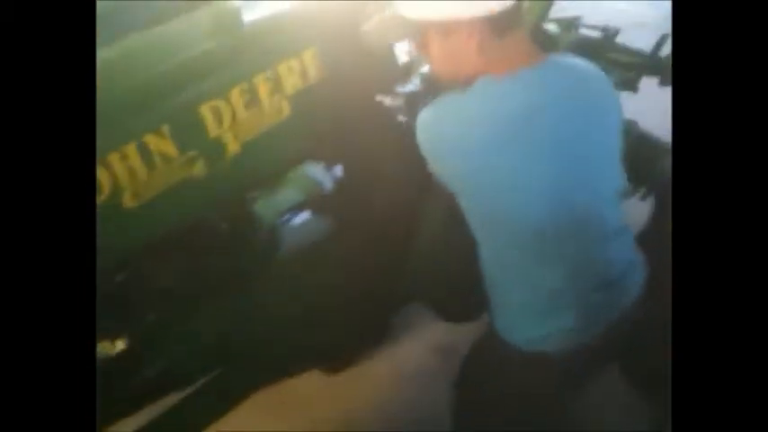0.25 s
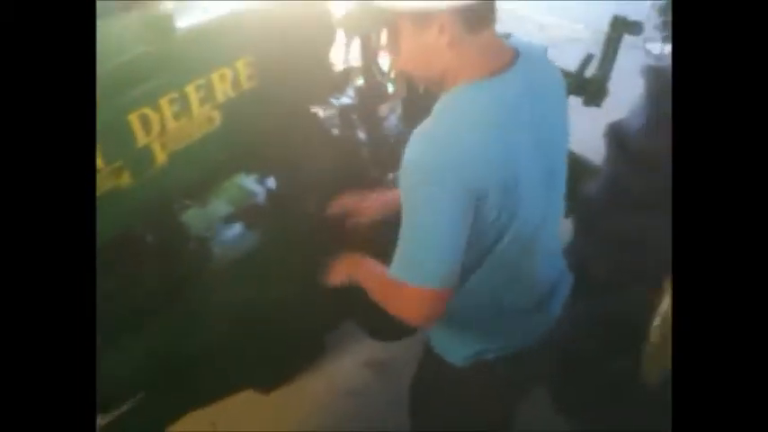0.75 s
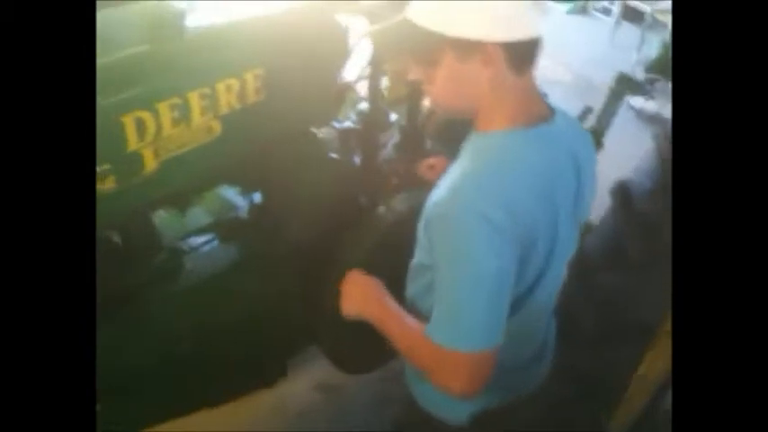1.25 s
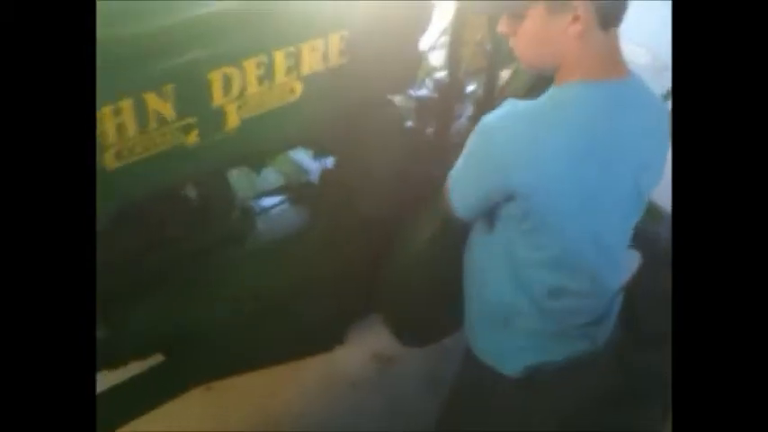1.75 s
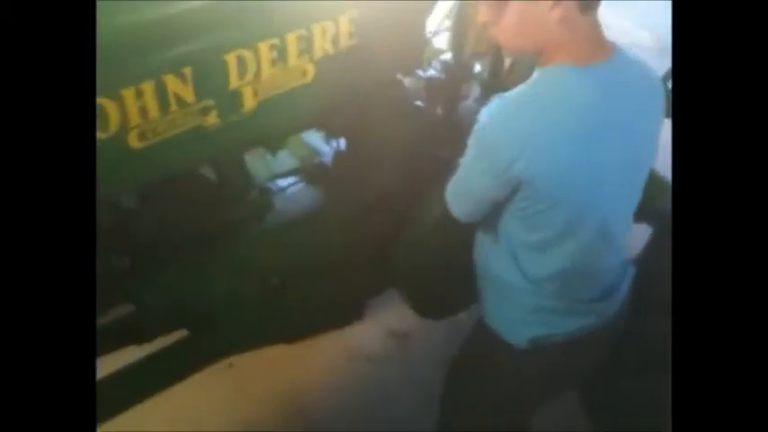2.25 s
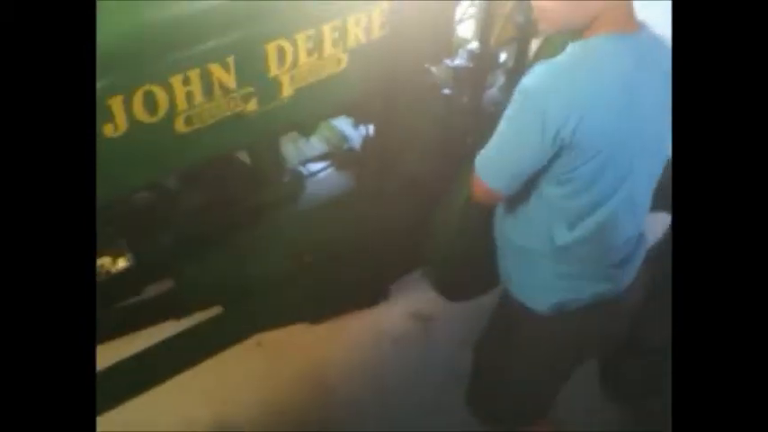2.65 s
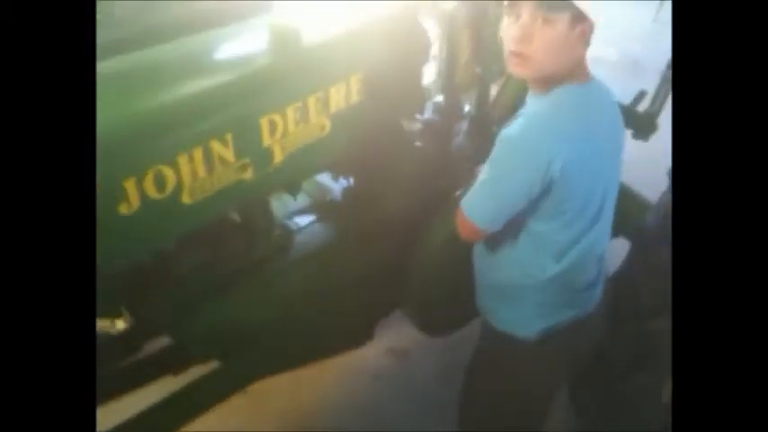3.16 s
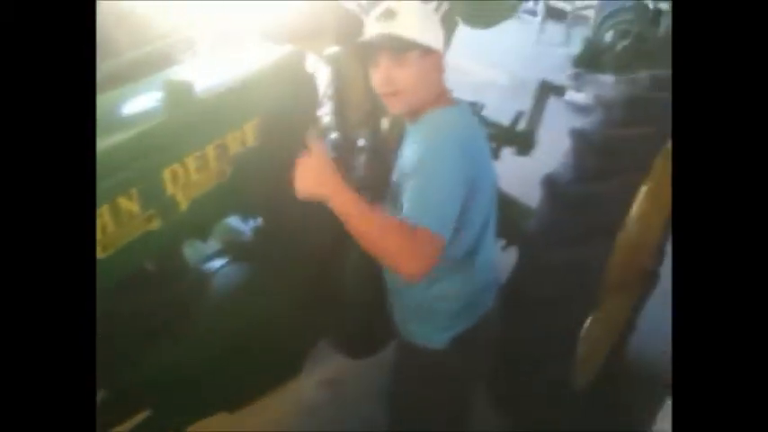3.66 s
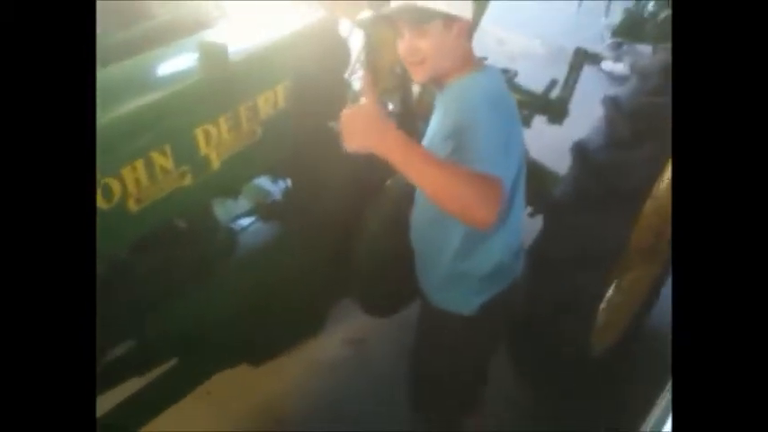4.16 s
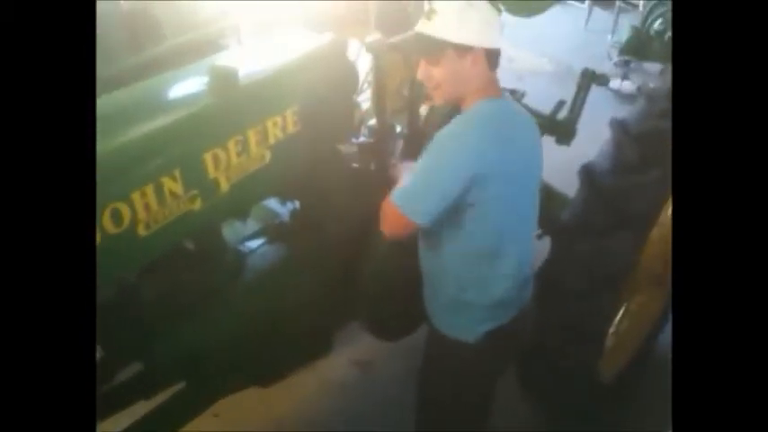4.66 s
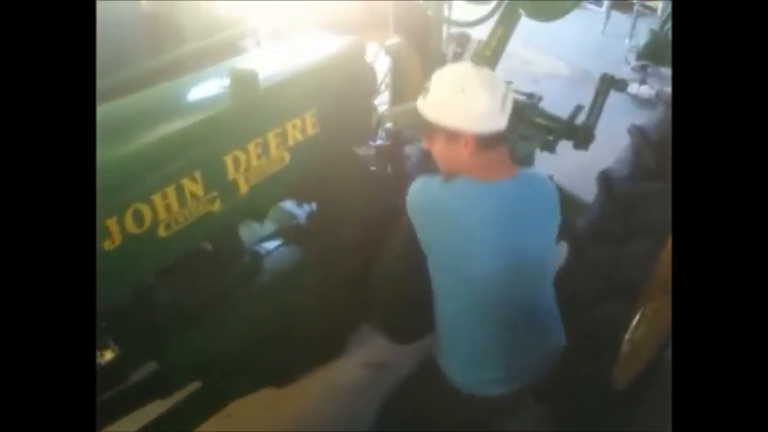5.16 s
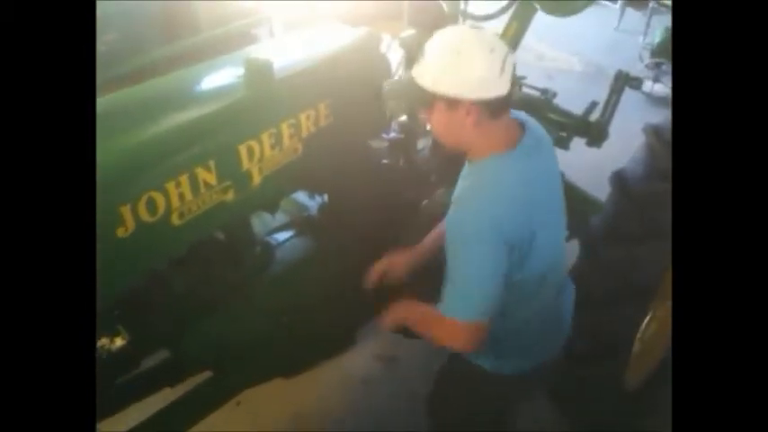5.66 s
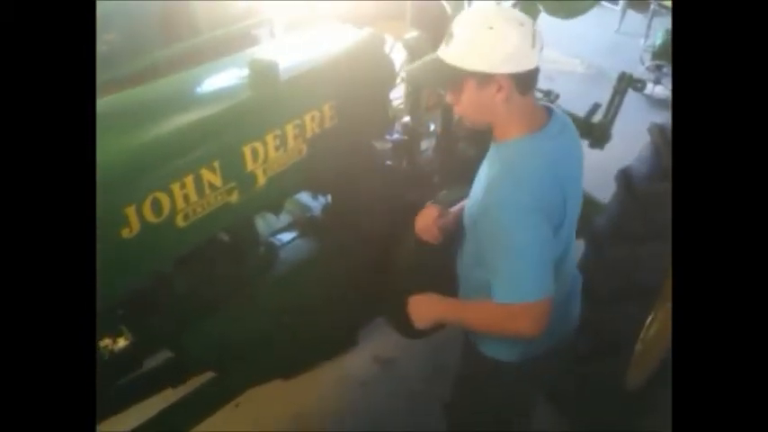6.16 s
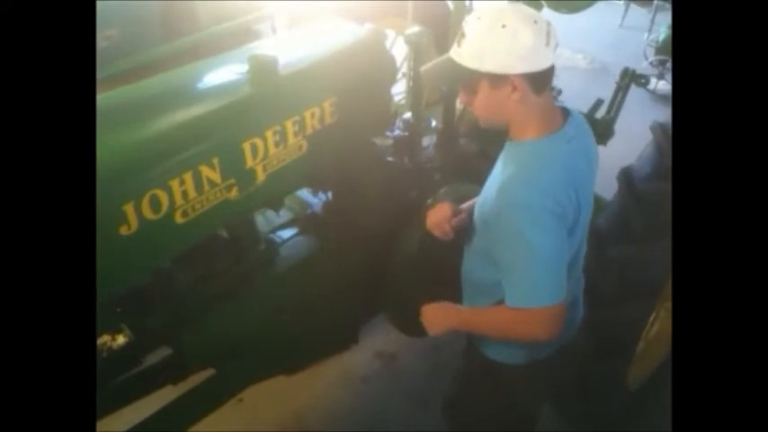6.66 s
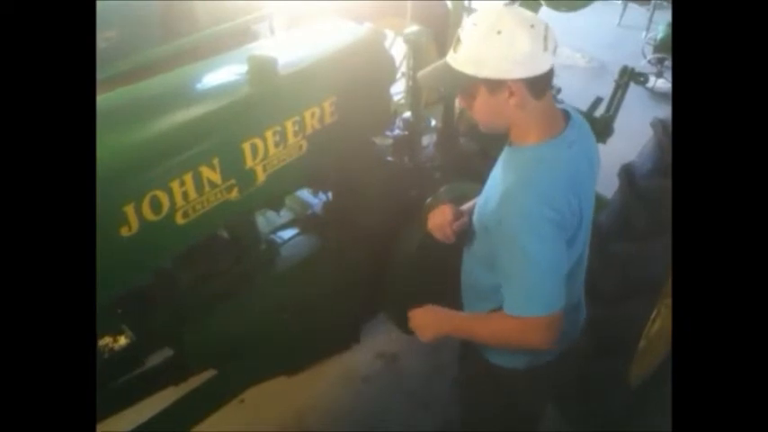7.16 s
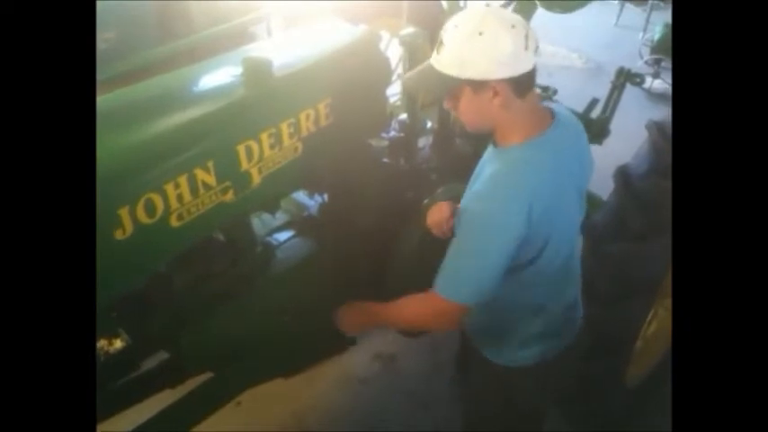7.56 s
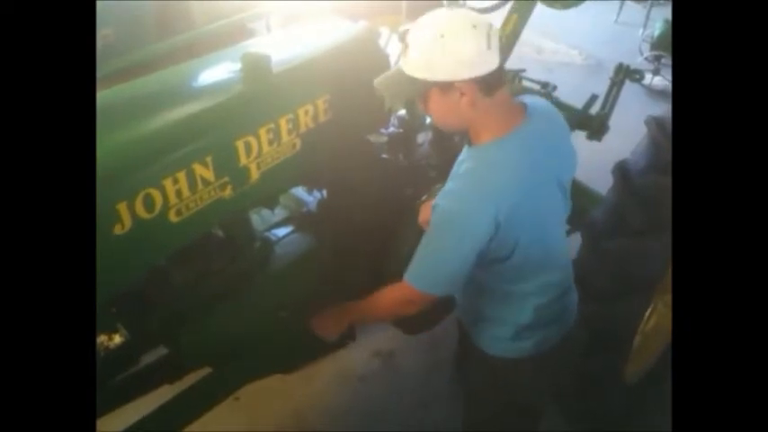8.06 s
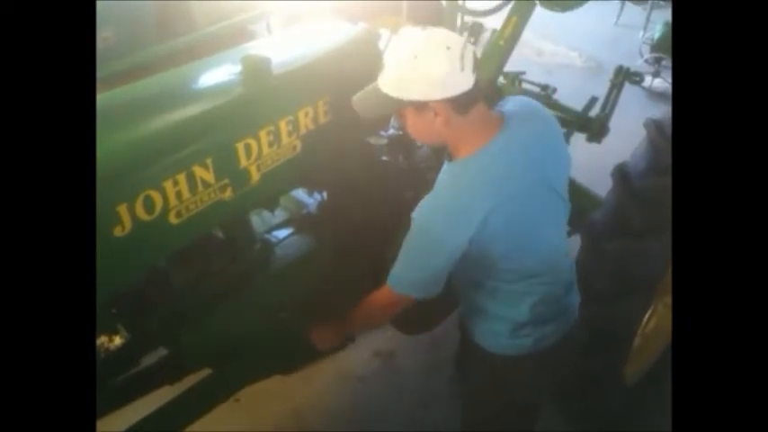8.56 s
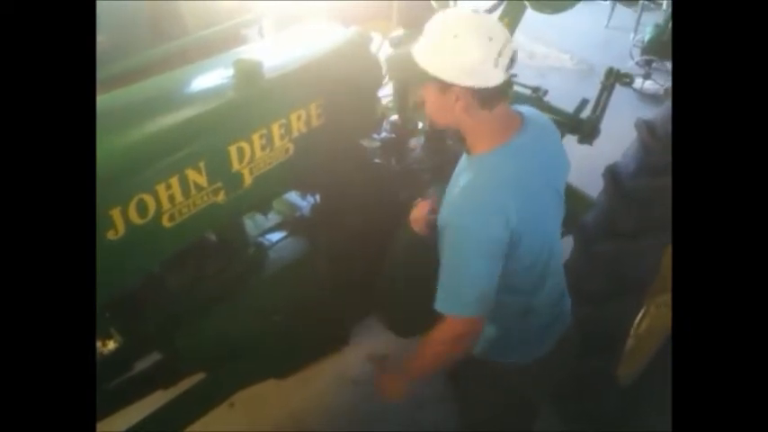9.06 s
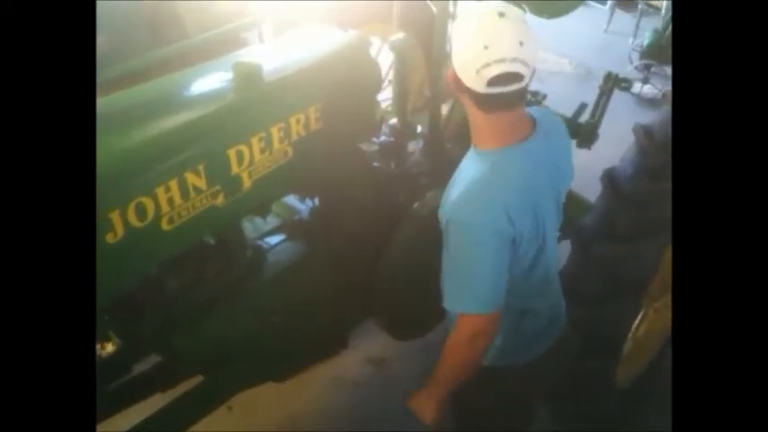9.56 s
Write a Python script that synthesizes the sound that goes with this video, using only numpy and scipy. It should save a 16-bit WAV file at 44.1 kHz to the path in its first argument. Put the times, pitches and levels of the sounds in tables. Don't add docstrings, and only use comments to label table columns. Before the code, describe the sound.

Hand-swung flywheel of an old two-cylinder tractor: air hisses, iron knocks, a second swing catches, blasting air jets give way to uneven exhaust popping.

```python
import sys
import numpy as np
from scipy import signal
from scipy.fft import rfft, irfft, next_fast_len
from scipy.io import wavfile
from scipy.ndimage import uniform_filter1d

SR = 44100
rng = np.random.default_rng(int(sys.argv[2]) if len(sys.argv) > 2 else 0)


def boost_factor(decibels):
    exponent = np.asarray(decibels, float) / 20
    return 10 ** exponent


def persist_wave(psi):
    counts = np.round(np.clip(psi, -1, 1) * 32767).astype(np.int16)
    wavfile.write(sys.argv[1], SR, np.atleast_2d(counts).T)


N = 432621
TIME = np.arange(N) / SR

# (time [s], level [dB])
PULL = [
    (0.0, -51.5),
    (0.118, -66.5),
    (0.35, -57.5),
    (0.465, -37.5),
    (0.565, -26.5),
    (.618, -25.5),
    (.645, -38.5),
    (0.74, -49),
    (.901, -58.5),
]
SQUEEZE = [
    (0.94, -32.5),
    (0.97, -23.5),
    (1.19, -16.5),
    (1.35, -21.5),
    (1.51, -32),
    (2.2, -38),
]
ROCK_BACK = [
    (2.47, -31),
    (3.07, -46.5),
    (3.34, -57),
    (3.52, -68.5),
    (3.62, -77),
    (3.76, -76.5),
]
REST = [
    (3.79, -61),
    (4.05, -51.5),
    (4.2, -67),
    (4.386, -69.5),
    (4.9, -61.5),
    (5.056, -56.5),
    (5.16, -77.5),
    (5.24, -67.5),
]
SECOND_PULL = [
    (5.334, -42.5),
    (5.478, -26),
    (5.6, -30),
]
RUNNING = [
    (5.75, -27),
    (5.9, -48.5),
    (6.22, -27),
    (6.35, -18.5),
    (7.86, -31.5),
    (8.02, -23.5),
    (8.18, -24.5),
    (8.53, -32.5),
    (9.81, -32.5),
]
STROKE_FIZZ = [
    4.5,
    -1,
    -1,
    -5,
    0,
    -3,
]
# (centre [Hz], width [Hz], level [dB])
WHISTLE = [(2040, 310, -1), (4330, 520, -3), (5720, 530, -6), (13400, 1000, -13.5), (5800, 2800, -2)]
# (frequency [Hz], level [dB])
BORE_AIR = [(300, -90), (1500, -10), (3000, 0), (8000, 0), (16000, -2)]
# (frequency [Hz], level [dB])
BLAST = [(300, -87.5), (1200, -15.5), (1700, -9.5), (3300, -12.5), (5400, -1.5), (7200, 1), (8500, -6),
         (11000, -5.5), (16000, -49.5)]
# (frequency [Hz], level [dB])
FIZZ = [(1000, -86.5), (5000, -39.5), (8000, -4.5), (10200, -0.5), (12000, -4.5), (13500, -4.5),
        (16000, -6.5)]
# (start [s], end [s], frequency [Hz], width [Hz], level over flow [dB])
EDGE_TONES = [(0, .14, 6600, 300, 0), (.33, .56, 9500, 500, -2), (.38, .56, 13700, 300, -11),
              (1.4, 2.3, 13450, 1800, -5), (2.1, 3.2, 13000, 2200, -5), (2.197, 2.8, 10300, 500, -19),
              (2.7, 3.56, 13400, 1700, -4), (2.6, 3.8, 4270, 150, -11), (1.6, 2.9, 4300, 370, -11),
              (2.2, 3.5, 6400, 300, -16), (5.657, 5.752, 11000, 5000, 23), (7.5, 7.545, 11550, 900, 22.5),
              (3.46, 3.7, 2010, 20, 4), (2.2, 3.8, 2100, 180, -22), (4.4, 5.2, 6200, 800, -11)]

# (time [s], gear level [dB])
MACHINERY = [(0.0, -50), (0.24, -52.5), (0.38, -45), (1.04, -37.5), (1.2, -35.5), (1.46, -44),
             (2.24, -50.5), (2.54, -44.5), (2.87, -46.5), (3.47, -58.5), (3.85, -60.5), (4.7, -53.5),
             (5.3, -53), (5.79, -35), (6.17, -28), (6.39, -24.5), (6.72, -24), (9.81, -23)]
# (time [s], level [dB])
LOAD = [
    (1.3, -7),
    (1.7, -11),
    (2.3, -4.5),
    (3.5, -4.5),
    (4, -6),
    (6.4, -6),
    (7.6, -0.6),
]
# (time [s], level [dB], rise [s], t60 [s])
LURCHES = [
    (3.92, -35.5, 0.043, 0.98),
    (5.6, -37.5, 0.12, 0.53),
]
# (frequency [Hz], level [dB])
BLOCK = [(15, -71), (25, -41), (75, -12), (179, 4.5), (313, 4.5), (357, 6), (460, -1.5), (600, -9),
         (780, -36), (1320, -120)]
# (frequency [Hz], level [dB])
GEARS = [(320, -17), (480, 3.5), (861, 2), (1360, 3), (2600, 0), (3000, -2), (4200, -16.5), (6000, -65),
         (8800, -120)]
# (frequency [Hz], level [dB])
YARD = [(20, -17), (60, -13), (110, 8.5), (200, 2.5), (500, -57), (900, -120)]
# (frequency [Hz], level [dB])
INSECTS = [(3500, -120), (6100, -15), (6600, -4), (7100, -8), (9000, -120)]

# (time [s], peak [dB], thud [dB], tick [dB], t60 [s])
FRAME = [(0.204, -36.5, -2, -22, 0.39), (0.225, -44.5, -9, 4.5, 0.42), (0.279, -36.5, -12, 7, 0.07),
         (0.376, -37, -12, -16, 0.27), (1.19, -27, -5, -6.5, 0.083), (1.897, -29, -11.5, -23, 0.31),
         (2.257, -35.5, -12, -11.5, 0.98), (2.57, -40, -7, -19, .2), (2.587, -33, 4.5, -5.5, 0.33),
         (2.938, -34.5, -3, -20, 0.12), (2.996, -40, -23, -16, 1), (4.045, -24, 1.5, 2.5, 0.16),
         (4.099, -33, -5.5, -20.5, 0.59), (5.053, -50, -33, 2, 0.36), (5.822, -18, -25, -10, 0.59)]
# (time [s], peak [dB], thud [dB], tick [dB], t60 [s])
CASE = [(0.473, -29.5, -8, -2, 0.42), (0.715, -41, 7, -12.5, 0.23), (0.75, -16, -22, 1.5, 0.46),
        (2.36, -30, -11, -15.5, 0.26), (2.748, -33.5, -1, -11, 0.17), (3.213, -43, -1.5, -25, 0.3),
        (3.778, -45, -1, -5, 0.84), (3.815, -15.5, -8, -33.5, 0.15), (3.829, -16, -26, -29, 0.61),
        (4.0, -25.5, -17, -9, 0.53), (4.159, -35, -5, -18, 0.23), (5.26, -41, -4, -23.5, 0.63),
        (5.359, -32.5, -10, -10, 0.4), (5.603, -21.5, -12, 2.5, 0.69), (6.165, -19, -20, -2, .2),
        (6.35, -8, -8, -12, .2), (6.575, -9, -10, -12, .15)]
# (frequency [Hz], level [dB])
CASTING = [(60, -61.5), (250, -9.5), (500, -6), (1000, -5.5), (2500, -6), (3200, -16.5), (8000, -20.5),
           (16000, -35)]
# (time [s],
# frequency [Hz], level [dB], t60 [s])
CLINKS = [(0.472, 1365, -37, 0.19), (0.751, 924, -34.5, 0.4), (.75, 1754, -25.5, 0.15),
          (.8, 236.6, -29, 0.41), (1.061, 271.5, -35, 0.5), (1.2, 160, -38.5, 0.68),
          (1.898, 2120, -23.5, 0.1), (2.591, 149.7, -38, 0.4), (2.748, 160, -34.5, 0.35),
          (2.585, 250, -39, .4), (2.6, 368, -42, .3), (2.75, 297, -40, .25), (2.45, 130, -46, .5),
          (8.1, 778, -19.5, 0.22), (2.934, 1010, -43, .06), (2.999, 1320, -40, .08),
          (3.825, 104.5, -32, 0.64), (3.829, 1210, -14.5, 0.022), (4.051, 104.4, -33.5, 0.77),
          (5.045, 2400, -46, .08), (5.39, 248, -42, 1), (5.823, 1910, -23, 0.28), (6.35, 2164, -16.5, 0.64),
          (6.35, 977, -13, 0.13), (6.863, 1030, -17, 0.32), (6.87, 1990, -14, 0.51), (7.27, 804, -30, 0.92),
          (7.53, 670, -16.5, 0.23), (7.53, 1053, -15.5, 0.084), (7.694, 10630, -12, 0.061),
          (.76, 62, -48.5, 0.36), (.88, 55.2, -45.5, 0.34), (1.94, 70.3, -47.5, .4), (3.83, 151, -30, 0.43),
          (8.5, 910, -36, 0.16)]
# (time [s], frequency [Hz], level [dB], t60 [s])
RINGS = [(5.36, 205, -43, 1.2), (1.898, 1830, -34, 0.065), (.221, 158, -28, .25), (.21, 243, -37.5, 0.22),
         (.317, 155, -37, 0.35), (2.26, 2200, -51, .4), (2.94, 800, -44, .04), (2.94, 450, -46, .04),
         (3.215, 620, -46, 0.041), (3.24, 270, -49, .3), (5.824, 1750, -24, .12), (5.83, 2060, -25.5, .15),
         (5.635, 285, -29.5, .3), (5.63, 500, -34.5, .25), (5.77, 430, -34, 0.25), (9.28, 664, -19, 0.22),
         (2.36, 340, -45, .2), (2.589, 1400, -47, .15), (2.935, 580, -52, 0.12), (3.21, 398, -47, 0.16),
         (6.35, 448.4, -21.5, 0.24), (7.09, 200, -20, 0.21), (.752, 920, -36, 0.49), (.76, 2400, -36, .3),
         (.756, 1500, -34, .3), (.79, 600, -41, 0.17), (.756, 1700, -41, .5), (.756, 2690, -37.5, 0.41),
         (3.85, 2330, -39, .3), (3.85, 2590, -45, .3), (3.83, 1356, -35, 0.37), (3.815, 1100, -31, 0.11),
         (6.365, 2205, -26, 0.3), (6.56, 1170, -20, 0.13), (6.56, 2130, -22, 0.32), (7.045, 820, -22, 0.25),
         (7.28, 780, -28.5, 0.61), (7.315, 1890, -23, 0.073), (8.5, 912, -27, 0.37), (8.5, 690, -34, 0.61),
         (8.9, 774, -27, 0.34), (8.93, 1134, -26.5, 0.2), (9.28, 710, -32, .4), (9.53, 1350, -29, 0.36)]

# (time [s], rms level [dB], rise [s], hold [s], t60 [s])
JETS = [(0.776, -27, 0.025, 0.015, 0.14), (0.826, -23.5, 0.018, 0.03, 0.15),
        (0.934, -21.5, .004, 0.081, 0.26), (5.647, -6, 0.026, 0.03, 0.53), (5.987, -23, 0.054, .02, .1),
        (6.035, -10.5, 0.049, 0.0091, 0.1), (6.073, -12, .015, .022, .05), (6.109, -24, .01, 0.018, .1),
        (6.173, 2, 0.027, 0.16, 0.15), (6.504, 2, 0.012, 0.05, 0.3), (6.723, -6, 0.018, .002, 0.06),
        (6.817, -2, 0.021, 0.034, 0.34), (6.996, 1.5, 0.02, 0.019, 0.29), (7.216, 1, 0.024, 0.018, 0.22),
        (7.437, 0.1, 0.0084, 0.044, 0.51), (7.853, 1.5, 0.0073, 0.03, 0.33),
        (8.078, -6.5, 0.013, 0.013, 0.081), (8.114, -9.5, 0.014, 0.025, 0.24),
        (8.26, -1.5, 0.0046, 0.027, 0.26), (8.913, -9.5, 0.02, 0.006, 0.25),
        (9.484, -7, 0.023, 0.016, 0.36)]
# (time [s], body [dB], treble [dB])
PUFFS = [(5.622, -22, -17.5), (6.47, -10, -0.5), (6.758, -16.5, -6), (6.968, -23, -7), (7.19, -24, -8.5),
         (7.411, -19.5, -7.5), (7.425, -13.5, -18.5), (7.828, -10.5, -8.5), (8.053, -12.5, -7),
         (8.238, -18.5, -10), (8.545, -31, -28), (8.74, -31.5, -29), (9.13, -33, -23.5)]
# (frequency [Hz], level [dB])
JET = [(590, -26), (1000, -18), (2340, -5.5), (2560, -6.5), (3830, -7), (5000, -1.5), (7720, -1.5),
       (15500, -2)]
# (time [s], level [dB])
JET_TOP = [
    (0, -9),
    (5.6, -1),
    (6.2, -4.5),
    (8.3, -2),
    (8.8, -9.5),
]

# (time [s], length [s], frequency [Hz], level [dB])
SQUEAKS = [
    (1.628, 0.076, 598, -45.5),
    (1.72, 0.025, 510, -49),
]

# (time [s], peak [dB], t60 [s])
CHUFFS = [
    (5.602, -17, 0.35),
    (5.824, -10, 0.083),
    (6.1654, -7, 0.17),
    (6.8044, -21, 0.1),
]
# (share of turn [0-1], level [dB], t60 [s], heard from [s])
VALVE_GEAR = [
    (0.014, -12, 0.16, 8.4),
    (.275, -14.5, 0.035, 7.6),
    (.548, -9.5, .085, 7.4),
]
# (frequency [Hz], level [dB])
CHUFF = [(60, -80), (300, -14), (1000, -7), (2500, 2.5), (5500, -4), (9000, -8), (16000, -16.5)]

# (time [s], level [dB],
# thump [Hz], bark [dB])
STRAYS = [
    (5.768, -23.5, 214, -30),
    (6.179, -28, 430, 19),
    (6.271, -10, 262, 8),
    (6.347, -5.5, 320, 1.5),
    (7.151, -17.5, 342, -0.5),
    (11, -26.5, 321, -18),
    (8.927, -11.5, 470, -13.5),
    (9.518, -11.5, 474, -12),
    (7.09, -10.5, 270, -15.5),
]
# (time [s], first level [dB], first bark [dB], second level [dB], second thump [Hz])
TURNS = [(6.556, -12.5, 7, -17.5, 179), (6.863, -5.5, 2, -19, 189.5), (7.038, -6.5, -4, -15, 210),
         (7.262, -11.5, -2, -22.5, 169), (7.479, -9.5, 0, -2.5, 207), (7.69, -28, -18.5, -43, 183.5),
         (7.893, -7.5, -2.5, -26, 172), (8.093, -9.5, -3.5, -6.5, 330), (8.295, -9.5, -8.5, -13.5, 183),
         (8.493, -6.5, -30, -18, 188), (8.692, -8, -14.5, -14, 178), (8.887, -6.5, -14.5, -8, 350),
         (9.08, -8.5, -9.5, -12.5, 353), (9.277, -6, -17, -19, 180.4), (9.475, -6, -5, -7.5, 363),
         (9.671, -9, -17, -14, 175.5)]
# (frequency [Hz], level [dB], t60 [s])
PIPE = [(172.4, -3.5, 0.3), (350, -1.5, 0.21), (443, -4.5, 0.2), (498.6, -6.5, 0.26), (668, -8.5, 0.32),
        (855.5, -4, 0.18), (888, -7, 0.089), (1070, -12.5, 0.092), (1170, -12, 0.18)]
# (frequency [Hz], level [dB])
BARK = [(100, -78.5), (400, -10.5), (700, -4.5), (1200, -4.5), (2500, -8), (5000, -14.5), (12000, -37)]

# (frequency [Hz], t60 [s])
SHED = [(150, 0.54), (1000, 0.92), (4000, 0.68), (15000, 0.13)]
# (frequency [Hz], level [dB])
MICROPHONE = [(20, -21.5), (60, -9), (90, -2.5), (120, -4.5), (200, -0.5), (16000, -2)]
# (time [s], from [Hz], to [Hz], level [dB])
SLIPS = [
    (1.09, 5700, 8300, -26),
    (1.44, 11000, 12400, -43),
    (2.83, 5700, 6900, -52),
    (7.5, 6800, 8350, -14),
    (7.49, 11000, 12300, -25),
    (7.889, 12800, 14300, -21),
]

FIZZ_KNEE_DB, FIZZ_FADES = -52.5, 0.55
EDGE_RISE, EDGE_FADE_S = 0.0015, 0.2
LURCH_GEAR_DB = -15
GEAR_BEAT, GEAR_RATTLE_DB, GEAR_RATTLE_HZ = 0.97, 1.5, 139
FRAME_HZ, CASE_HZ = 160, 262
MODE_DB, MODE_GAP_HZ = 3, 71.6
CLUSTER_SPREAD, RING_SPREAD = 0.034, 0.004
JET_TILT_DB, TOP_SPLIT_HZ = 3.5, 12000
PUFF_RISE_S, PUFF_HOLD_S, PUFF_T60_S = 0.012, 0.004, 0.1
SPUTTER_DB, SPUTTER_HZ = 1, 88.3
CHUFF_SCATTER_DB = 0.4
FIRST_HZ, SECOND_AFTER_S, SECOND_BARK_DB = 228.5, 0.0465, -5.5
RAGGED_DB, RAGGED_HZ = 0.5, 120
FAVOUR_DB, FAVOUR_OCTAVES = 4.5, 0.15
OVERLOAD, OVERLOAD_KNEE = 0.83, 14
HISS_DB, TOP_HZ = -72, 15780


def unit(x):
    return x / np.sqrt(np.mean(x ** 2) + 1e-20)


def along(points, hz):
    f, v = np.transpose(points)
    return np.interp(np.log(hz + 1), np.log(f + 1), v)


def curves(rows):
    s, *cols = np.transpose(rows)
    return [np.interp(TIME, s, c) for c in cols]


def filtered(x, response):
    m = next_fast_len(x.shape[-1] + 8192)
    spectrum = rfft(x, m) * response(np.fft.rfftfreq(m, 1 / SR))
    return irfft(spectrum, m)[..., :x.shape[-1]]


def resonance(modes):
    return lambda f: sum((-1) ** k * boost_factor(db) * 1j * f * w / (c * c - f * f + 1j * f * w)
                         for k, (c, w, db) in enumerate(modes))


def rush(spectrum, patchy_db):
    z = signal.stft(rng.standard_normal(N), nperseg=512)[2]
    field = uniform_filter1d(rng.standard_normal(z.shape), size=5, axis=0)
    field = uniform_filter1d(field, size=8, axis=1)
    x = signal.istft(z * boost_factor(patchy_db * unit(field)), nperseg=512)[1][:N]
    return unit(filtered(x, lambda hz: boost_factor(along(spectrum, hz))))


def flicker(db, low_hz, high_hz):
    noise = rng.standard_normal(N)
    return boost_factor(db * unit(filtered(noise, lambda hz: (hz > low_hz) & (hz < high_hz))))


def add(track, s, sound):
    part = track[round(s * SR):][:len(sound)]
    part += sound[:len(part)]


def burst(s, rise, hold, t60):
    out = np.zeros(N)
    first = np.ceil(s * SR) / SR
    t = TIME[:2 * SR] + first - s
    ramp = np.clip(t / rise, 0, 1) ** 1.24
    add(out, first, ramp * boost_factor(-60 * np.clip(t - rise - hold, 0, 2) / t60))
    return out


def leak():
    strokes = [PULL, SQUEEZE, ROCK_BACK, REST, SECOND_PULL, RUNNING]
    rows = [(s, db, over) for stroke, over in zip(strokes, STROKE_FIZZ) for s, db in stroke]
    flow_db, over_db = curves(rows)
    fizz_db = flow_db + over_db - FIZZ_FADES * np.clip(FIZZ_KNEE_DB - flow_db, 0, None)
    blend = np.pi / 2 * np.clip((flow_db + 31) / 10, 0, 1)
    bore = rush(BORE_AIR, patchy_db=1.4)
    bore = unit(filtered(bore, lambda hz: sum(abs(resonance([mode])(hz + 1)) for mode in WHISTLE)))
    air = np.cos(blend) * bore + np.sin(blend) * rush(BLAST, patchy_db=1.3)
    return boost_factor(flow_db) * air + boost_factor(fizz_db) * rush(FIZZ, patchy_db=1.6) + edge_tones(flow_db)


def edge_tones(flow_db):
    out = np.zeros(N)
    for start, end, hz, width, db in EDGE_TONES:
        t = TIME[:round((end - start) * SR)]
        level_db = np.interp(start + t, TIME, flow_db)
        noise = rng.standard_normal(2 * SR)
        flutter = filtered(noise, lambda f: 1 / (1 + (2 * f / width) ** 4))[:len(t)]
        pitch = hz * (1 + EDGE_RISE * np.clip(level_db + 38, -20, 10))
        turn = 2 * np.pi * np.cumsum(pitch) / SR
        fade = min(EDGE_FADE_S, (end - start) / 2)
        gate = np.clip(np.minimum(t, end - start - t) / fade, 0, 1)
        add(out, start, boost_factor(level_db + db) * gate * unit(flutter * np.sin(turn)))
    return out


def rumble():
    (gear_db,), (block_db,) = curves(MACHINERY), curves(LOAD)
    lurch = sum(boost_factor(db) * burst(s, rise, 0.01, t60) for s, db, rise, t60 in LURCHES)
    beat = sum(burst(s, 0.0093, 0.0087, 1.0) for s, *rest in firings())
    beat = (0.34 + beat) / (0.47 + uniform_filter1d(beat, size=SR // 3))
    block = (boost_factor(gear_db + block_db) + lurch) * rush(BLOCK, patchy_db=2.2)
    chatter = flicker(GEAR_RATTLE_DB, 15, GEAR_RATTLE_HZ)
    gears = (boost_factor(gear_db) + boost_factor(LURCH_GEAR_DB) * lurch) * unit(chatter * rush(GEARS, patchy_db=2.5))
    drone = beat * block + beat ** GEAR_BEAT * gears
    yard = boost_factor(-65) * rush(YARD, patchy_db=2)
    insects = boost_factor(-66) * burst(4.24, 0.302, 0.53, 0.56) * rush(INSECTS, patchy_db=8)
    return drone + yard + insects


def knocks():
    out, t = np.zeros(N), TIME[:SR]
    for thud_hz, s, db, thud_db, tick_db, t60 in [(FRAME_HZ, *k) for k in FRAME] + [(CASE_HZ, *k) for k in CASE]:
        a, b, c = rng.standard_normal((3, SR))
        modes_db = MODE_DB * rng.standard_normal(SR // 100)
        mode_numbers = np.arange(len(modes_db))
        hollow = resonance([(thud_hz, 30, 0), (1.58 * thud_hz, 50, -5)])
        thud = unit(filtered(a, lambda hz: hollow(hz) * hz ** 2 / (hz ** 2 + 110 ** 2)))
        thud = thud * boost_factor(thud_db - 40 * t / t60)
        body = unit(filtered(b, lambda hz: boost_factor(
            along(CASTING, hz) + np.interp(hz / MODE_GAP_HZ, mode_numbers, modes_db))))
        body = body * (boost_factor(-60 * t / t60) + 0.26 * boost_factor(-60 * t / 0.1))
        tick = unit(filtered(c, resonance([(6360, 4700, 0)]))) * boost_factor(tick_db - 90 * t / t60)
        add(out, s - 0.001, boost_factor(db - 6.5) * (thud + body + tick) * (1 - np.exp(-t / 0.0017)))
    return out


def clinks():
    out, t = np.zeros(N), TIME[:SR]
    for spread, s, hz, db, t60 in [(CLUSTER_SPREAD, *c) for c in CLINKS] + [(RING_SPREAD, *c) for c in RINGS]:
        cluster = hz + spread * (100 + hz) * rng.standard_normal((9, 1))
        phase = 1.42 * rng.standard_normal((9, 1)) * (hz < 400)
        ring = np.sin(2 * np.pi * cluster * t + phase).sum(axis=0)
        add(out, s, boost_factor(db - 11 - 60 * t / t60) * np.clip(t * hz, 0, 1) * ring)
    return out


def jets():
    air = rush([(100, -92)] + JET, patchy_db=1.9)
    air = unit(air * flicker(SPUTTER_DB, 15, SPUTTER_HZ))
    dull = filtered(air, lambda hz: 1 / (1 + (hz / 7500) ** 4))
    middle = filtered(air - dull, lambda hz: 1 / (1 + (hz / TOP_SPLIT_HZ) ** 6))
    top = air - dull - middle
    blows = [(*jet, JET_TILT_DB) for jet in JETS]
    blows += [(s, (db + treble_db) / 2, PUFF_RISE_S, PUFF_HOLD_S, PUFF_T60_S, (treble_db - db) / 2)
              for s, db, treble_db in PUFFS]

    def swell(tilt, ring):
        return sum(boost_factor(db + tilt * tilt_db) * burst(s, rise, hold, ring * t60)
                   for s, db, rise, hold, t60, tilt_db in blows)

    return swell(-1, 1) * dull + swell(1, 0.65) * middle + swell(1, 0.54) * boost_factor(curves(JET_TOP)[0]) * top


def squeaks():
    out = np.zeros(N)
    for s, length, hz, db in SQUEAKS:
        t = TIME[:round(length * SR)]
        turn = 2 * np.pi * hz * t * (1 - 0.42 * t)
        tone = np.sin(turn) + 0.88 * np.sin(2 * turn) + 0.35 * np.sin(3 * turn)
        add(out, s, boost_factor(db) * np.sin(np.pi * t / length) * tone)
    return out


def valves():
    starts = np.array(TURNS)[:, 0]
    periods = np.append(np.diff(starts), np.diff(starts)[-1])
    chuffs = list(CHUFFS)
    for s, period in zip(starts, periods):
        for share, db, t60, since in VALVE_GEAR:
            if s > since:
                chuffs.append((s + share * period, db + CHUFF_SCATTER_DB * rng.standard_normal(), t60))
    gulps = sum(boost_factor(db - 8) * burst(s - 0.003, 0.0057, 0.011, t60) for s, db, t60 in chuffs)
    return gulps * rush(CHUFF, patchy_db=1)


def firings():
    first = [(s, db, FIRST_HZ, bark_db) for s, db, bark_db, *second in TURNS]
    second = [(s + SECOND_AFTER_S, db, hz, SECOND_BARK_DB) for s, *pop, db, hz in TURNS]
    return STRAYS + first + second


def exhaust():
    out, t = np.zeros(N), TIME[:SR // 2]
    swell = 1 - np.exp(-(t / 0.016) ** 2)
    for s, db, thump_hz, bark_db in firings():
        thump = np.sin(2 * np.pi * thump_hz * t * (1.15 - 14 * t)) * np.exp(-((t - 0.008) / 0.0038) ** 2)
        ring = np.zeros(len(t))
        for hz, level, t60 in PIPE:
            favour_db = FAVOUR_DB * np.exp(-(np.log2(hz / thump_hz) / FAVOUR_OCTAVES) ** 2)
            level_db = level + 2 * np.tanh(rng.normal()) + favour_db
            ring += boost_factor(level_db - 60 * t / t60) * np.sin(2 * np.pi * (hz * t + rng.random()))
        add(out, s - 0.002, boost_factor(db + 1.5) * thump + boost_factor(db - 7.5) * ring * swell)
    bark = unit(rush(BARK, patchy_db=3.5) * flicker(RAGGED_DB, -1, RAGGED_HZ))
    barks = sum(boost_factor(db + bark_db - 6) * burst(s, 0.0054, 0.011, 0.21) for s, db, thump_hz, bark_db in firings())
    return out + bark * barks


def shed(x):
    out, size = np.zeros(N), SR // 2
    for start in range(0, N, size):
        hz, t, z = signal.stft(rng.standard_normal(size), SR, nperseg=256)
        fall = boost_factor(-60 * t / along(SHED, hz)[:, None])
        tail = signal.istft(z * fall, SR, nperseg=256)[1]
        answer = signal.fftconvolve(x[start:start + size], tail / np.linalg.norm(tail))
        add(out, start / SR + 0.012, answer)
    return out


def scene():
    iron = knocks() + clinks() + squeaks()
    air = jets() + valves()
    firing = exhaust()
    walls = shed(boost_factor(-11) * firing + boost_factor(-11) * iron + boost_factor(-9) * air)
    mono = leak() + rumble() + iron + air + firing + walls
    return np.array([mono, mono])


def low_pass(x):
    return signal.sosfilt(signal.butter(12, 15690, fs=SR, output="sos"), x)


def record(dry):
    x = filtered(dry, lambda hz: boost_factor(along(MICROPHONE, hz)))
    x = x / (1 + np.abs(x / OVERLOAD) ** OVERLOAD_KNEE) ** (1 / OVERLOAD_KNEE)
    x = x + boost_factor(HISS_DB) * rng.standard_normal(N)
    hiss = rng.standard_normal(N)
    side = np.zeros(N)
    for s, low, high, db in SLIPS:
        band = unit(filtered(hiss, lambda hz: (hz > low) & (hz < high)))
        side += boost_factor(db) * band * np.cos(np.pi * np.clip((TIME - s) / 0.046, -0.5, 0.5))
    mix = filtered(x + [side, -side], lambda hz: 1 / (1 + np.exp((hz - TOP_HZ) / 60)))
    return low_pass(mix)


dry = scene()
out = record(dry)
persist_wave(out)
```